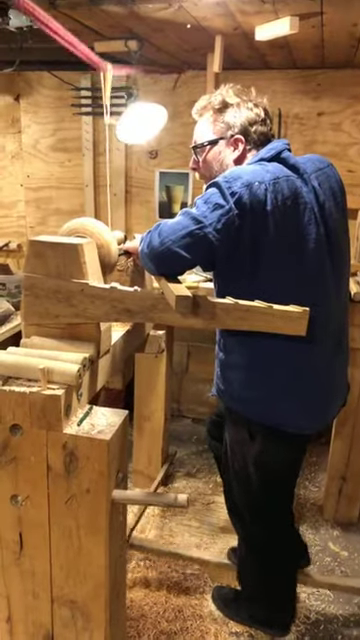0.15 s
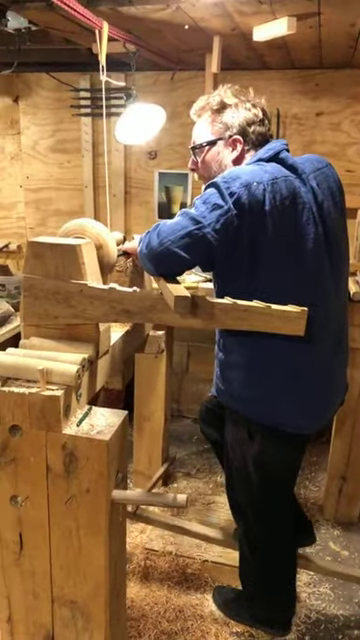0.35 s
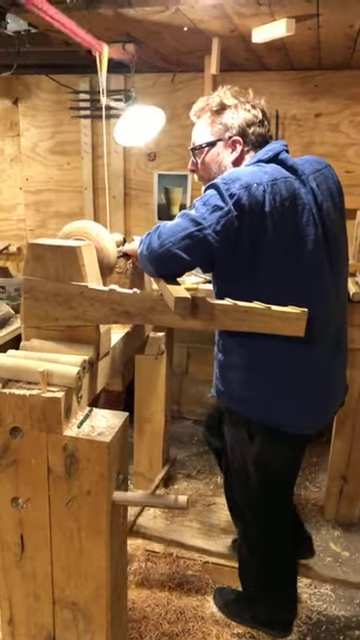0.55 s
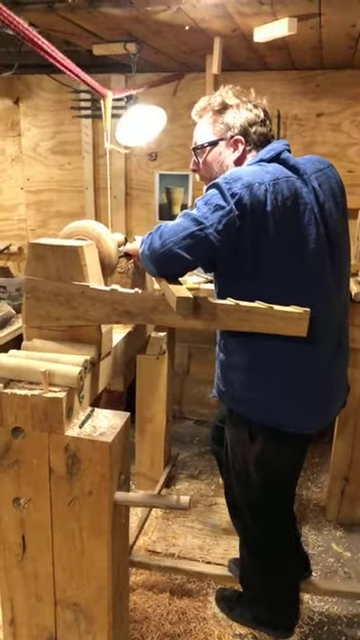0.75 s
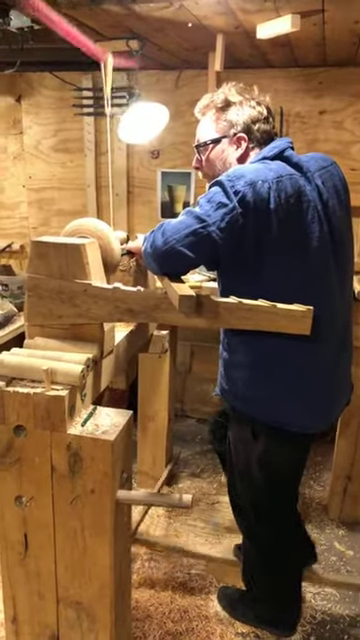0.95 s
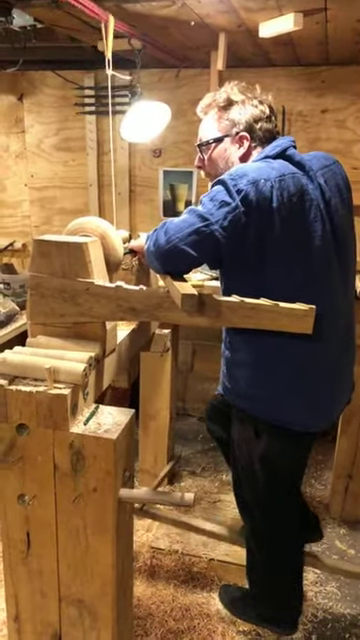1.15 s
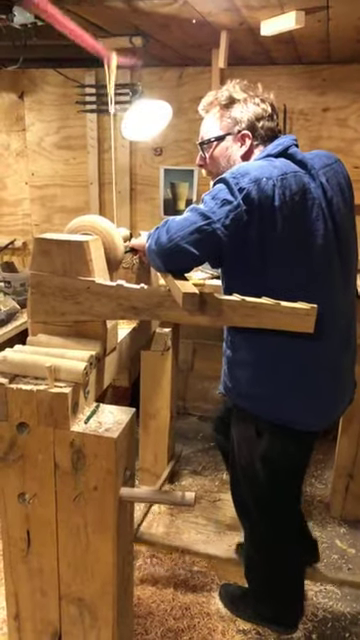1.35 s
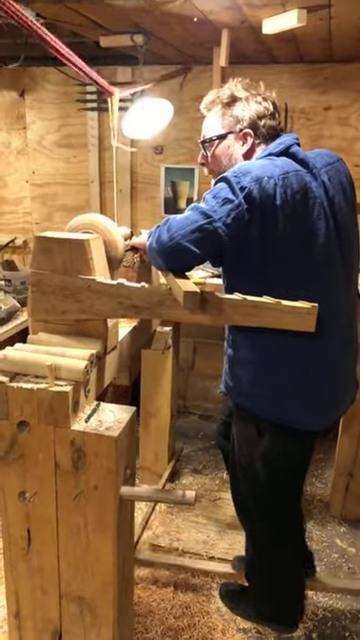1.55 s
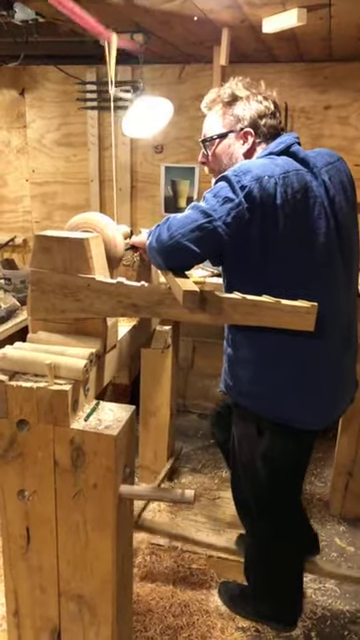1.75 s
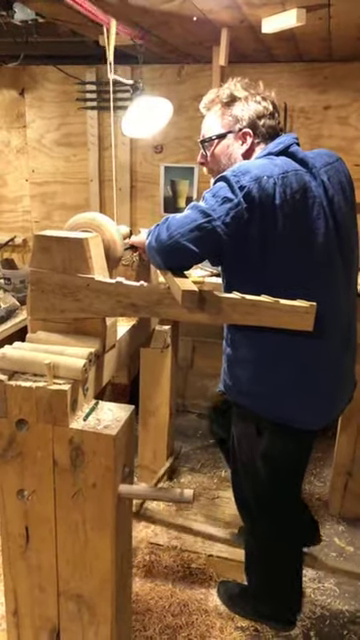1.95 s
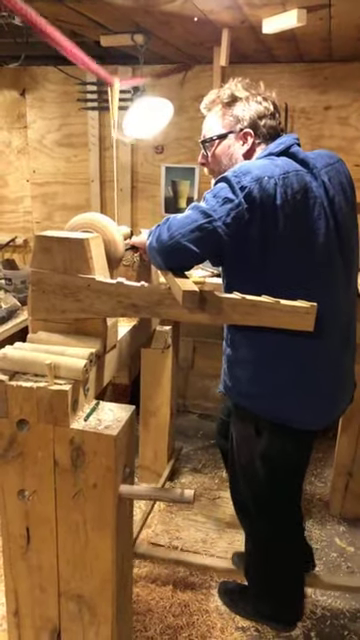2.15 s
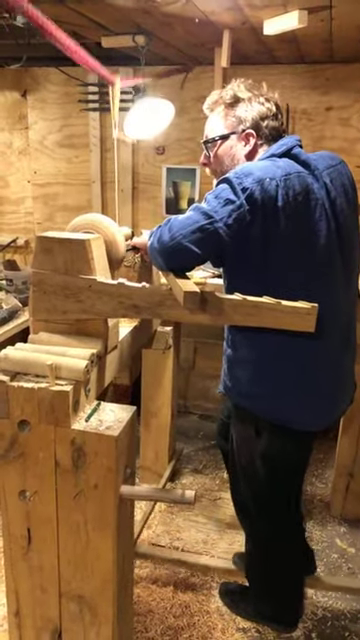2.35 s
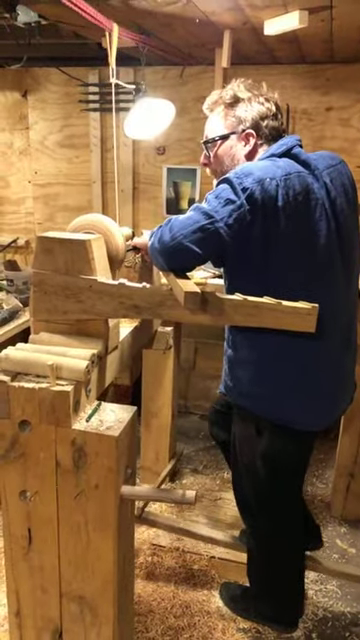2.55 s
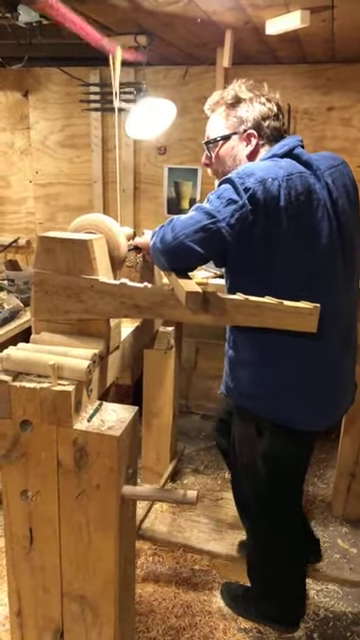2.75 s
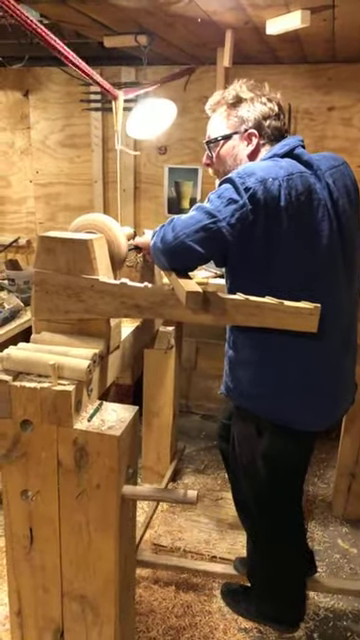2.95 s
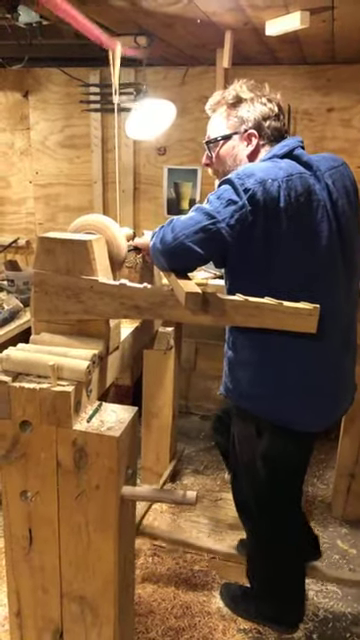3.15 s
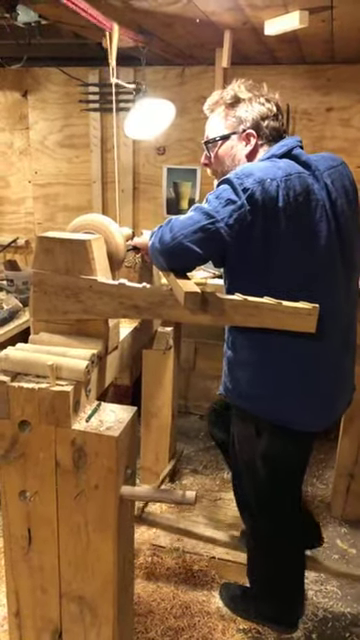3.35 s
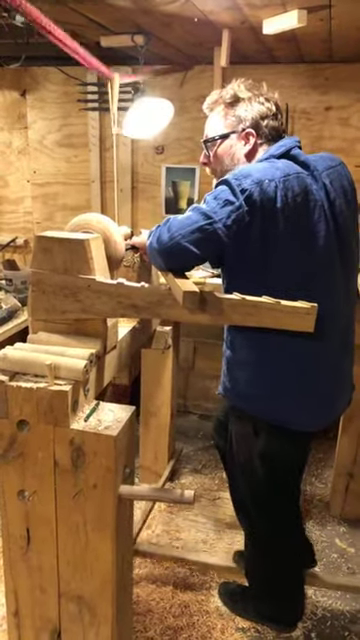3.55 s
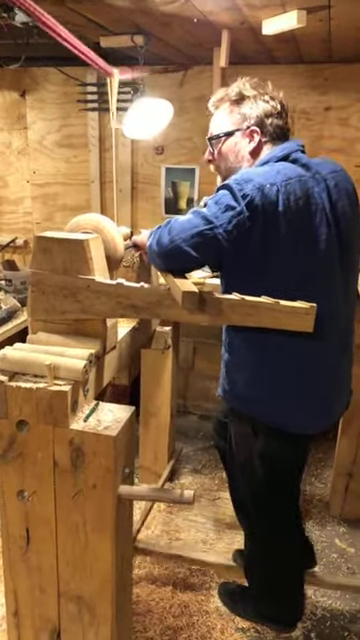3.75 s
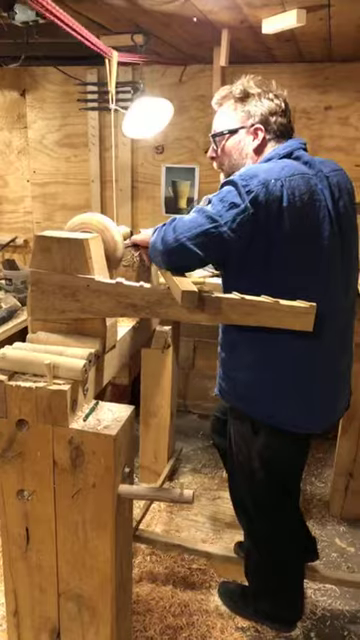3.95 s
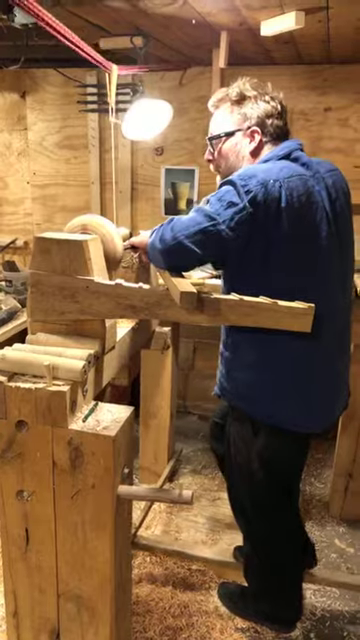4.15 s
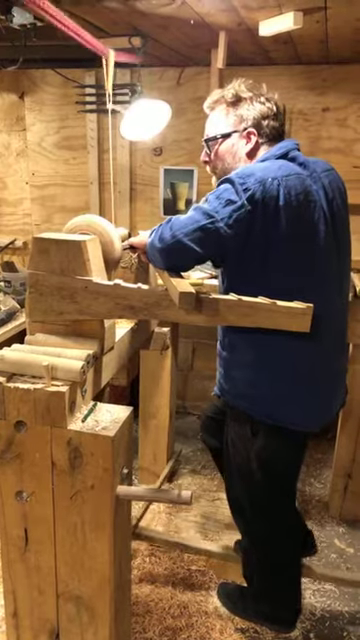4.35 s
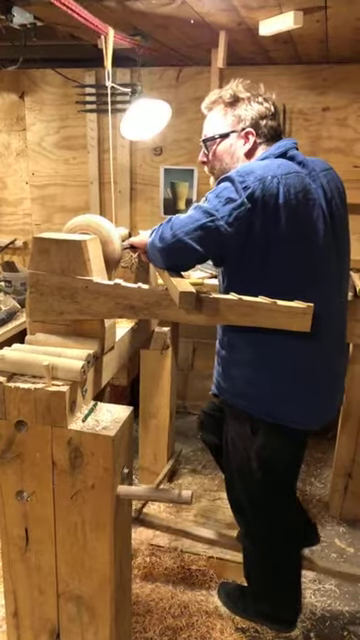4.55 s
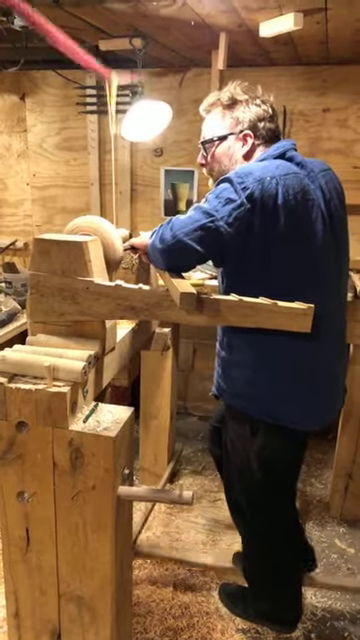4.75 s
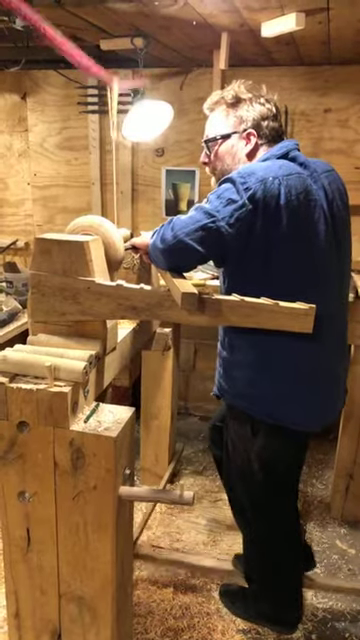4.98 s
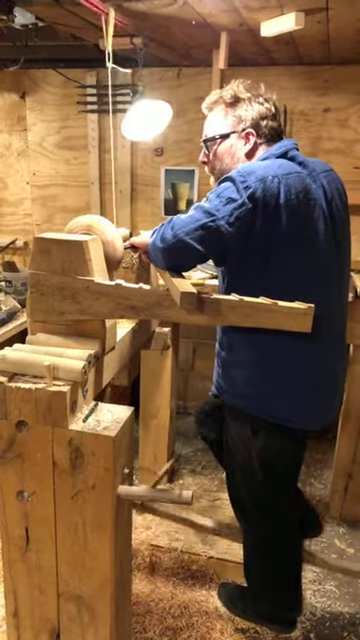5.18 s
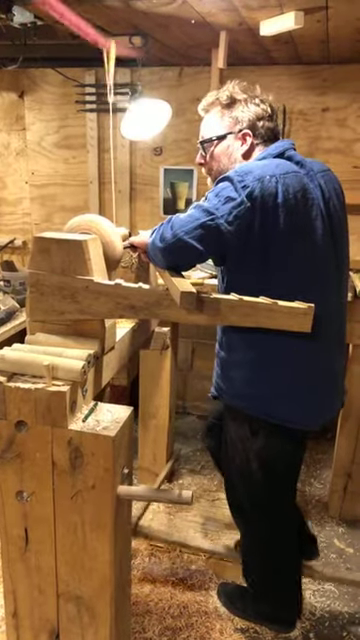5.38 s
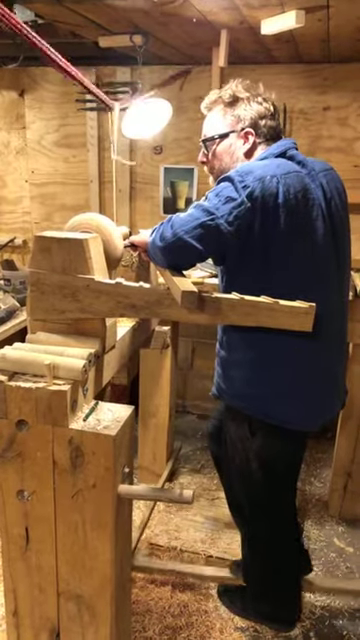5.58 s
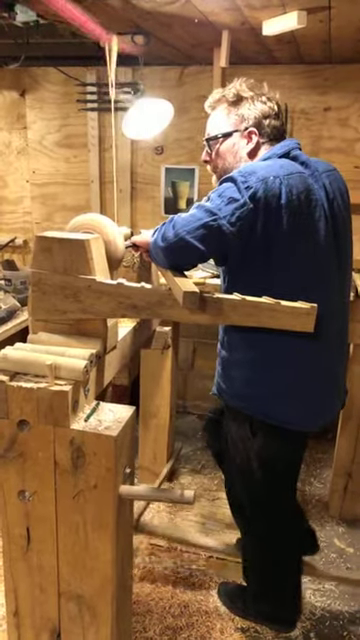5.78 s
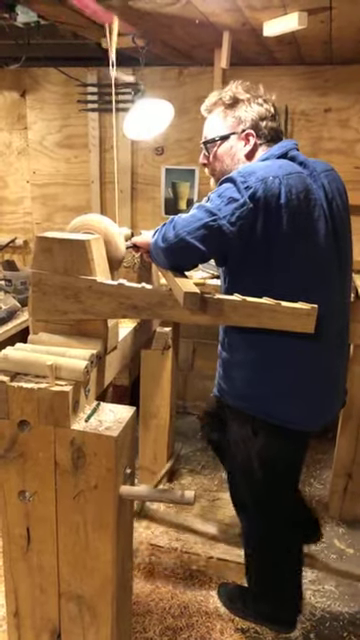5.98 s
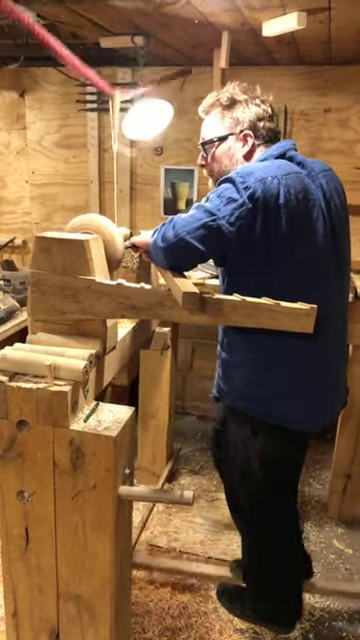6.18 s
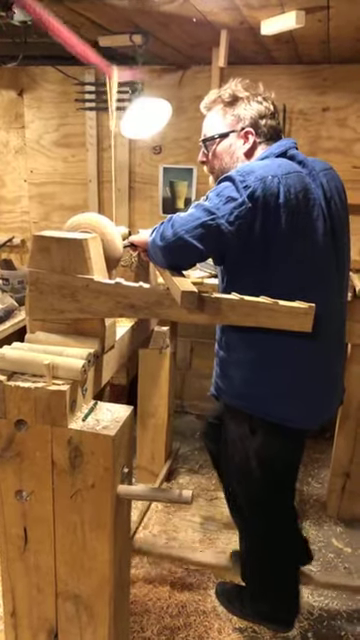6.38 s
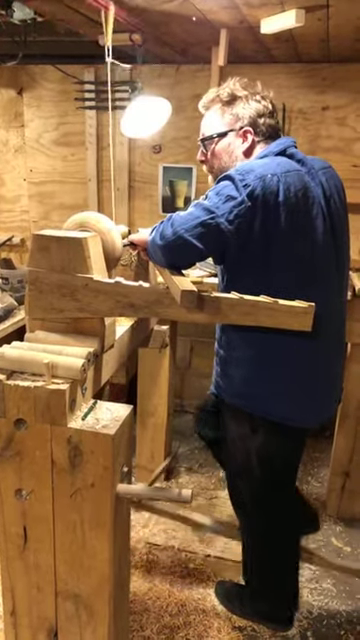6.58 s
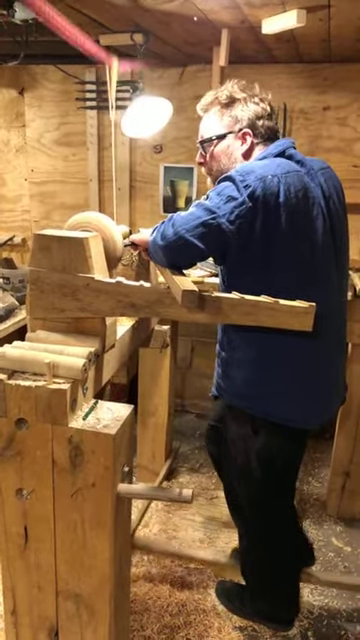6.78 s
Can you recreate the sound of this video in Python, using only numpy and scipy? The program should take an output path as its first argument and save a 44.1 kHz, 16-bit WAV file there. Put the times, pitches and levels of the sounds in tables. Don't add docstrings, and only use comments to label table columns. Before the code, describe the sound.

Coarse, hollow scraping swells and fades as a foot-driven bowl turns against a cutting edge, each stroke fluttering brighter as end grain passes. Between strokes come softer rubbing, dull bed knocks and small wood taps. One stroke is missing midway, replaced by quiet rubs and a thump; then harder strokes follow, with two tool skids, the second bright and metallic. Near microphone, small wooden room, quiet low hum.

```python
import sys
import numpy as np
from scipy import signal
from scipy.fft import rfft, irfft, next_fast_len
from scipy.io import wavfile

SR = 44100
rng = np.random.default_rng(int(sys.argv[2]) if len(sys.argv) > 2 else 0)


def attenuation_scalar(level_db):
    decades = np.asarray(level_db, float) / 20
    return 10 ** decades


def output_pcm(signal):
    pcm = np.clip(np.atleast_2d(signal).T, -1, 1) * 32767
    wavfile.write(sys.argv[1], SR, np.round(pcm).astype(np.int16))


N = 300762

# (frequency [Hz], density [dB per Hz])
HUM_SPECTRUM = [(25, -14), (40, -18), (62, -2.5), (80, -1), (105, -28), (160, -16.5), (400, -22.5),
                (1000, -24), (3000, -36), (8000, -40), (15000, -48)]
HUM_DB = -61

# (start [s], length [s], force on the bowl [dB], bite of the edge [dB re force])
DOWN_STROKES = [(0.395, 0.489, -37, -19), (1.171, 0.43, -36.5, -16), (1.878, 0.48, -36.5, -19),
                (2.584, 0.52, -38.5, -23.5), (3.312, 0.4, -38, -18.5), (4.558, 0.39, -34, -14),
                (5.204, 0.45, -33, -20.5), (5.885, 0.49, -35, -18.5), (6.591, 0.45, -33, -15.9)]
# (start [s], length [s], force [dB], bite [dB re force])
BACK_RUBS = [(-0.113, 0.16, -35, -21.5), (0.047, 0.13, -48, -14), (0.168, 0.12, -47.5, -14),
             (0.24, 0.16, -45, -15.5), (0.832, 0.21, -83, 6), (0.96, 0.066, -55.5, -8.5),
             (1.004, 0.14, -42, -15.5), (1.55, 0.34, -82, 7.5), (1.785, 0.15, -49, -13.5),
             (2.315, 0.093, -62, -6.5), (2.439, 0.17, -49, -7), (2.492, 0.13, -42.5, -21),
             (3.116, 0.055, -58.5, -5), (3.17, 0.12, -42, -14), (3.74, 0.15, -67, -9),
             (3.886, 0.16, -66, -29), (4.209, 0.24, -51, -18), (4.33, 0.24, -42, -15),
             (4.91, 0.36, -73, 8.5), (5.147, 0.11, -44, -8.5), (5.603, 0.34, -79.5, 12.5),
             (6.344, 0.17, -77.5, 10), (6.516, 0.069, -64.5, 0), (6.548, 0.08, -45, -5)]
# (time [s], strength [dB])
END_GRAIN = [(0.575, 4.5), (0.703, 4.9), (1.328, 4.5), (1.445, 5), (2.065, 5.5), (2.169, 6), (2.753, 7.5),
             (2.855, 9), (3.457, 6.5), (3.561, 6.5), (4.693, 3.5), (4.794, 3.3), (5.306, 6), (5.417, 6),
             (5.509, 5.5), (6.008, 5.0), (6.102, 6.5), (6.188, 6.5), (6.681, 5), (6.786, 5)]
# (time [s], level [dB])
CATCHES = [(.48, 7.5), (.76, 4.5), (1.25, 4), (1.52, 3.5), (1.84, 4), (1.98, 1.5), (2.27, 4.5), (2.87, 0.5),
           (3.25, 5), (3.59, 8.5), (4.41, 3.5), (4.82, 3.5), (5.32, 5), (5.53, 4), (6.04, 4), (6.12, 7),
           (6.209, 10.5), (6.7, 2.5), (6.8, 3)]
# (time [s], level [dB])
THUDS = [(.38, -55.5), (.57, -66), (1.11, -50.5), (1.92, -55), (2.05, -66), (2.58, -53), (2.89, -55),
         (3.02, -57), (3.44, -57), (3.59, -68), (4.41, -61), (4.54, -56), (4.82, -59.5), (5.43, -62),
         (5.54, -60), (6.04, -63), (6.15, -58), (6.21, -60), (6.76, -60)]
END_GRAIN_S, CATCH_S, THUD_S = 0.035, 0.017, 0.025
FRAME_DB, FRAME_FOLLOWS = -65.5, 0.3
# (offset [dB re force], share of the bite [dB/dB], power of the speed [-],
# share of the end grain [dB/dB], dying away [dB/s])
RESPONSE = [
    (0, 0.011, 1.43, -0.0846, 133),
    (4, 0.5, 1.284, 1.78, 202),
    (0.16, 1, 1.57, 2.5, 235),
]

# (frequency [Hz], width [Hz], first-grip level [dB], new-grip level [dB])
BOWL_MODES = [(235, 36, -13.5, -15.5), (341, 22, -5.5, -9), (382.2, 14.2, -1.5, -3), (445, 49, -10, -12.5),
              (507.9, 12.3, -1, -3), (545, 40, -7.5, -14), (598.5, 22.6, -4, -10), (638.3, 15.6, -2.5, -8),
              (669.2, 16, -5.5, -3), (757.3, 13, -4, -1.5)]
# (frequency [Hz], width [Hz], level [dB])
SHANK_FIRST_GRIP = [(1110, 15, -7), (1379, 61, 3.5), (1416, 67, 1), (1457, 9.1, -5.5), (1633, 27, -2.5),
                    (1813, 25, -9), (2014, 22.4, 1), (2290, 36, -13), (2619, 36, -1.5), (2638, 11, -8.5),
                    (3083, 12.5, -5.5), (3620, 24, -11.5), (3790, 70, -12)]
# (frequency [Hz], width [Hz], level [dB])
SHANK_NEW_GRIP = [(1081, 31, -6.5), (1270, 29, -5), (1373, 28, -3), (1450, 34, -2), (1650, 27, -0.5),
                  (1720, 45, -7), (1784, 12, 0.5), (1845, 17.6, 3), (2095, 42, -5.5), (2260, 11, -4.5),
                  (2576, 26, 0), (3005, 22.5, -1.5), (3310, 7.4, -3.5), (3674, 25, -9), (3990, 79, -15.5)]
REGRIP_S = 4.1
# (frequency [Hz], width [Hz], level [dB])
EDGE_MODES = [(4880, 31, -1), (6360, 31, -7), (6644, 35, -6.5), (7800, 69, -43), (7700, 55, -17),
              (8570, 100, -11.5), (9100, 44, -8), (9760, 28, -9.5), (11900, 74, -12.5), (11500, 48, -28),
              (11670, 230, -19.5), (12700, 28, -27), (12500, 86, -18), (13800, 73, -39), (14600, 50, -27),
              (14900, 88, -20)]
# (frequency [Hz], density [dB per Hz])
TEARING_SPECTRUM = [(90, -49), (220, -14), (760, -13.5), (900, -19), (1500, -10), (3000, -12.5),
                    (4200, -27.5), (5200, -21), (6000, -32.5), (9500, -31.5), (13000, -35.5), (15500, -52)]

# (time [s], level [dB], T60 [s], mode [Hz])
THUMPS = [(.005, -20.5, .3, 250), (1.04, -21, .4, 363), (1.235, -14, 0.48, 342), (1.81, -21, 0.4, 373),
          (2.54, -21, .4, 200), (4.245, -25.5, .4, 352), (4.385, -17, 0.49, 348), (6.16, -14, 0.28, 240)]
# (time [s], peak [dB])
SNAPS = [
    (0.395, -21.5),
]
# (time [s], level [dB], T60 [s], strong mode [Hz], weak mode [Hz])
TOUCHES = [(.465, -21, 0.13, 1360, 2100), (0.97, -28.5, 0.16, 1110, 1510), (1.024, -21, 0.087, 2140, 1480),
           (1.799, -46, 0.13, 2560, 1500), (2.48, -28, 0.2, 2070, 1450), (3.132, -44, 0.1, 1350, 2530),
           (3.191, -25.5, 0.59, 1450, 2500), (3.8, -43.5, 0.45, 2140, 920), (3.91, -41, 0.7, 1290, 925),
           (4.162, -35, 0.16, 2060, 1070), (4.225, -38, 0.19, 714, 380), (6.535, -27.5, 0.46, 2320, 1060)]
# (time [s], level [dB], rise [s], T60 [s], scuff top [Hz])
SKIDS = [
    (5.182, -11.5, 0.0068, 0.19, 6440),
    (6.569, -12, 0.0019, 0.22, 13800),
]
# (frequency [Hz], width [Hz], level [dB])
SKID_MODES = [
    [(1520, 22, 6), (2310, 57, -12), (2800, 39, -3), (3060, 88, -9), (3970, 30, -12), (4420, 53, -9),
     (5330, 25, -14), (6090, 42, -15)],
    [(1050, 60, -5), (1450, 97, -3), (2800, 100, -3), (4020, 88, -9), (4410, 30, 3), (4820, 60, -4),
     (5660, 32, -11), (5920, 69, -10), (6660, 34, -12), (7450, 42, -12), (8410, 40, -9), (10400, 31, -13),
     (11200, 68, -14)],
]

# (frequency [Hz], T60 [s])
SHOP_T60 = [(200, 0.68), (700, 0.39), (2000, 0.26), (8000, 0.19)]
CUTOFF_HZ = 15770


def rms_one(x):
    return x / np.sqrt(np.mean(x ** 2) + 1e-20)


def at_hz(points, hz):
    table = np.array(points)
    return np.interp(np.log(hz + 1), np.log(table[:, 0]), table[:, 1])


def coloured(x, spectrum):
    hz = np.arange(N // 2 + 1) * SR / N
    return irfft(rfft(x) * attenuation_scalar(at_hz(spectrum, hz)), N)


def swell(rate, depth_db):
    r = np.exp(-50 * np.pi * rate / SR)
    noise = rng.standard_normal(N // 25 + 2001)
    slow = signal.lfilter([1], [1, -2 * r, r * r], noise)[2000:]
    return np.repeat(attenuation_scalar(depth_db * rms_one(slow)), 25)[:N]


def building_hum():
    noise = coloured(rng.standard_normal(N), HUM_SPECTRUM)
    return attenuation_scalar(HUM_DB - 1.5) * swell(14, depth_db=0.3) * rms_one(noise)


def fibres(per_s, spread_db, clump_db):
    sizes = attenuation_scalar(spread_db * np.minimum(rng.exponential(1, N), 5)) * rng.choice([-1, 1], N)
    breaks = rng.random(N) < per_s / SR
    return rms_one(sizes * breaks * swell(54, clump_db))


def resonate(x, modes, wander_db=0):
    out = 0
    for k, (hz, width, level_db) in enumerate(modes):
        r = np.exp(-np.pi * width / SR)
        poles = [1, -2 * r * np.cos(2 * np.pi * hz / SR), r * r]
        drive = x * swell(11.2, wander_db)[:len(x)] if wander_db else x
        ring = signal.lfilter([(1 - r * r) / 2, 0, (r * r - 1) / 2], poles, drive)
        out = out + (-1) ** k * attenuation_scalar(level_db) * ring
    return out


def band(x, low_hz, high_hz):
    sos = signal.butter(4, [low_hz, min(high_hz, SR / 2.3)], "band", fs=SR, output="sos")
    return signal.sosfilt(sos, x)


def bumps(s, events, width):
    return np.exp(-.5 * ((s - np.array(events)[:, :1]) / width) ** 2)


def effort(s):
    strokes = np.transpose(DOWN_STROKES + BACK_RUBS)[:, :, None]
    start, length, force_db, bite_db = strokes
    speed = np.abs(np.sin(np.pi * np.clip((s - start) / length, 0, 1)))
    grain_db = np.array(END_GRAIN)[:, 1] @ bumps(s, END_GRAIN, END_GRAIN_S)
    levels = []
    for offset_db, bite, law, grain, dying in RESPONSE:
        force = attenuation_scalar(force_db + offset_db + bite * bite_db) * speed ** law
        now_db = 10 * np.log10(np.sum(force ** 2, axis=0) + 1e-10) + grain * grain_db
        levels.append(np.maximum.accumulate(now_db + dying * s) - dying * s)
    levels[0] = levels[0] + np.array(CATCHES)[:, 1] @ bumps(s, CATCHES, CATCH_S)
    thud = attenuation_scalar(np.array(THUDS)[:, 1]) @ bumps(s, THUDS, THUD_S)
    frame = thud + attenuation_scalar(FRAME_DB + FRAME_FOLLOWS * (levels[0] + 46.5))
    return *levels, 20 * np.log10(frame)


def cut():
    s = np.arange(0, N + 100, 100) / SR
    bowl_db, shank_db, edge_db, frame_db = effort(s)
    floor_db = -68 + .2 * (bowl_db + 45)
    spray = fibres(6000.0, spread_db=2.0, clump_db=0.8)
    broad = coloured(fibres(8000.0, spread_db=2.5, clump_db=0.38), TEARING_SPECTRUM)

    regrip = round(REGRIP_S * SR)
    before, after = spray[:regrip], spray[regrip:]
    bowl_first, bowl_new = np.array(BOWL_MODES)[:, [0, 1, 2]], np.array(BOWL_MODES)[:, [0, 1, 3]]
    bowl = np.append(resonate(before, bowl_first, wander_db=2.5), resonate(after, bowl_new, wander_db=2.5))
    shank = np.append(resonate(before, SHANK_FIRST_GRIP, wander_db=2.0),
                      resonate(after, SHANK_NEW_GRIP, wander_db=1.3))
    edge = resonate(spray, EDGE_MODES, wander_db=2.5)

    parts = ((band(broad + attenuation_scalar(2.5) * bowl, 201, 1220), bowl_db),
             (band(broad + attenuation_scalar(-0.5) * shank, 860, 5760), shank_db),
             (band(broad + attenuation_scalar(-13.0) * edge, 4050, 20500), edge_db),
             (band(spray, 99.0, 156.3), frame_db),
             (band(spray, 37.0, 75), floor_db))
    time = np.arange(N) / SR
    return sum(rms_one(x) * attenuation_scalar(np.interp(time, s, level_db) - 0.5) for x, level_db in parts)


def rattle(grit, s, level_db, rise, t60, modes, scuff_db, top_hz):
    first = round(s * SR)
    contacts = grit[first:first + SR // 2]
    since = np.arange(len(contacts)) / SR
    force = contacts * (1 - np.exp(-since / rise)) * attenuation_scalar(level_db - 60 * since / t60)
    sound = resonate(force, modes) + attenuation_scalar(scuff_db) * band(force, 550, top_hz)
    return np.pad(sound, (first, N - first - len(since)))


def bed_thumps(grit):
    return sum(rattle(grit, s, level_db, 0.0094, t60, [(hz, 45.0, 0)], scuff_db=-48.0, top_hz=1500)
               for s, level_db, t60, hz in THUMPS)


def snap():
    clicks = np.full(N, 1e-18)
    for s, peak_db in SNAPS:
        clicks[round((s + .00115) * SR)] = -attenuation_scalar(peak_db - 6.0)
        clicks[round((s + .00135) * SR)] = attenuation_scalar(peak_db + 12.0)
    return band(resonate(clicks, [(3200, 2100, 5.5), (8100, 4000, -26.0)]), 900, 10500)


def touches(grit):
    out = 0
    for s, level_db, t60, strong_hz, weak_hz in TOUCHES:
        modes = [(strong_hz, 40.0, 0), (weak_hz, 40.0, -4.5)]
        out = out + rattle(grit, s, level_db, 0.0024, t60, modes, scuff_db=-21.0, top_hz=3800)
    return out


def skids(grit):
    out = 0
    for (s, level_db, rise, t60, top_hz), modes in zip(SKIDS, SKID_MODES):
        out = out + rattle(grit, s, level_db, rise, t60, modes, scuff_db=-23.5, top_hz=top_hz)
    return out


def shop(x):
    size = next_fast_len(N + SR)
    hz = np.arange(size // 2 + 1) * SR / size
    echo = 0
    for k, lag in enumerate(rng.uniform(.011, .037, 10)):
        loop = attenuation_scalar(-60 * lag / at_hz(SHOP_T60, hz)) * np.exp(-2j * np.pi * hz * lag)
        echo = echo + (-1) ** k * loop / (1 - loop)
    return irfft(rfft(x, size) * echo, size)[:N]


def scene():
    hum = building_hum()
    lathe = cut()
    grit = fibres(12000.0, spread_db=1.8, clump_db=.8)
    lathe = lathe + bed_thumps(grit) + touches(grit) + skids(grit)
    return (lathe + attenuation_scalar(-16.0) * shop(lathe) + snap() + hum)[None]


def top_cut(x):
    return signal.sosfilt(signal.butter(12, 16470, fs=SR, output="sos"), x)


def record(dry):
    low_pass = signal.ellip(12, .5, 70, CUTOFF_HZ, fs=SR, output="sos")
    mix = signal.sosfilt(low_pass, dry)
    return top_cut(mix)


dry = scene()
out = record(dry)
output_pcm(out)
```